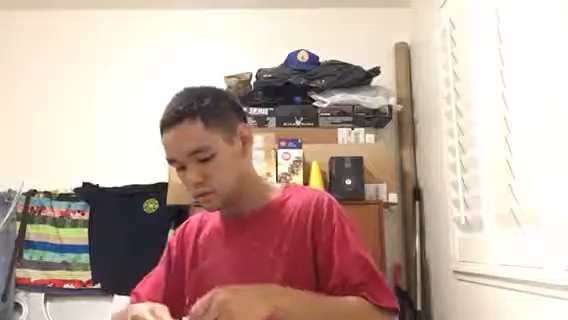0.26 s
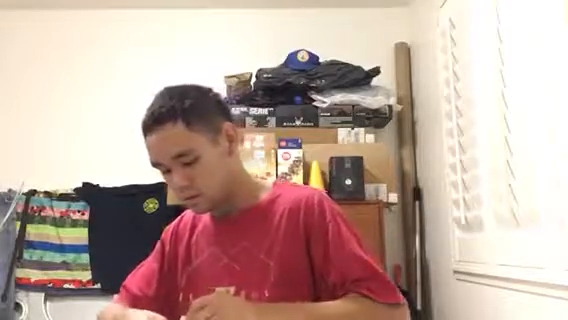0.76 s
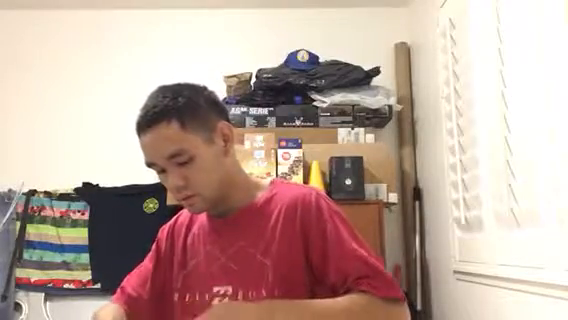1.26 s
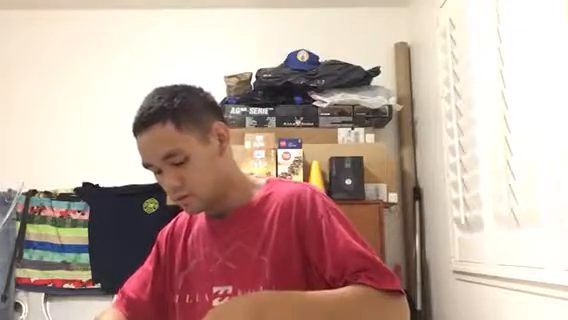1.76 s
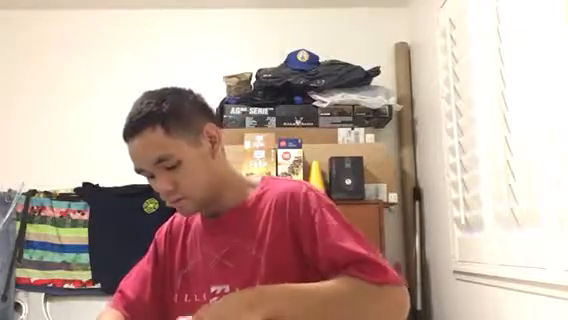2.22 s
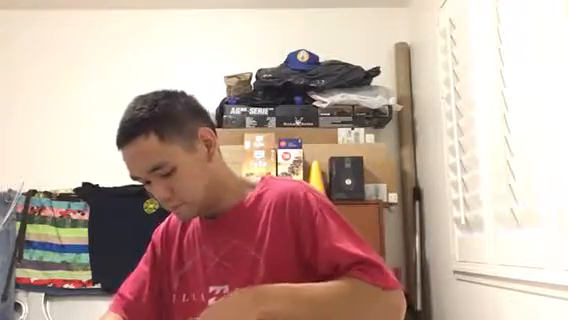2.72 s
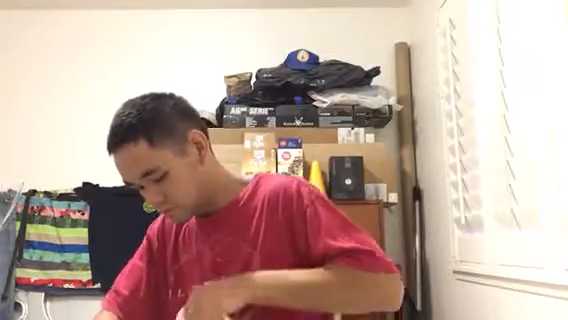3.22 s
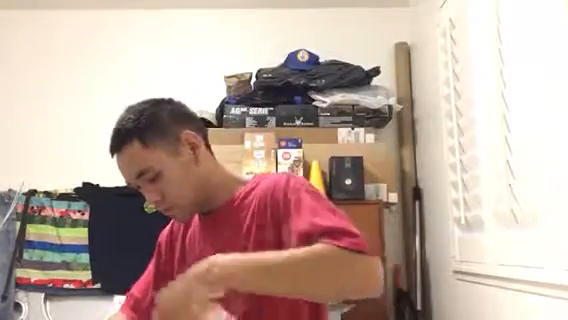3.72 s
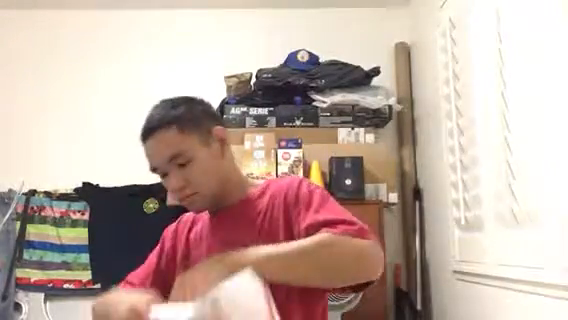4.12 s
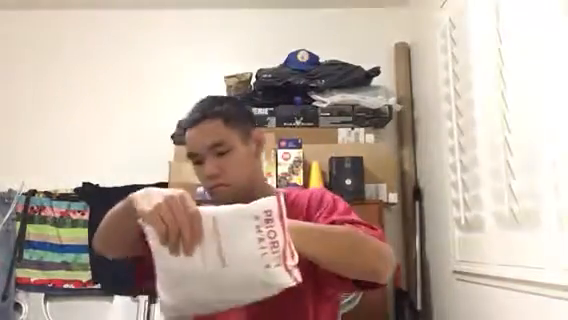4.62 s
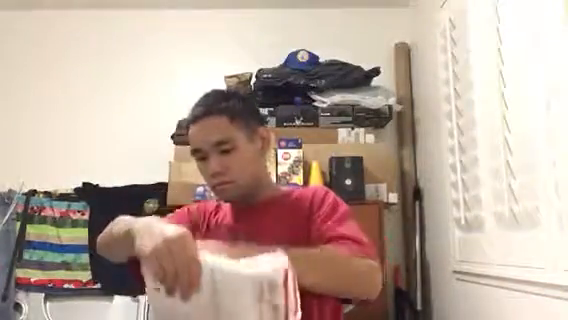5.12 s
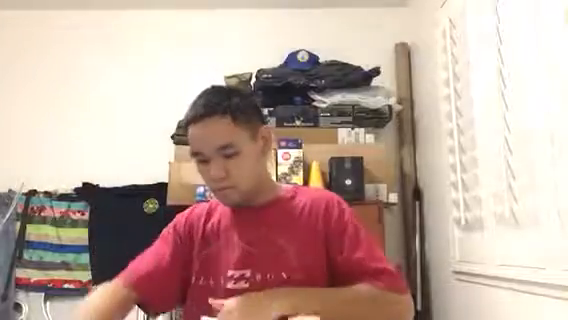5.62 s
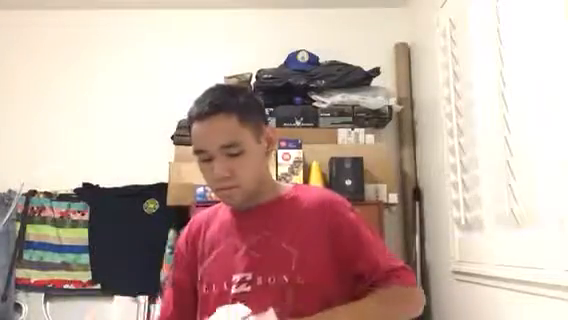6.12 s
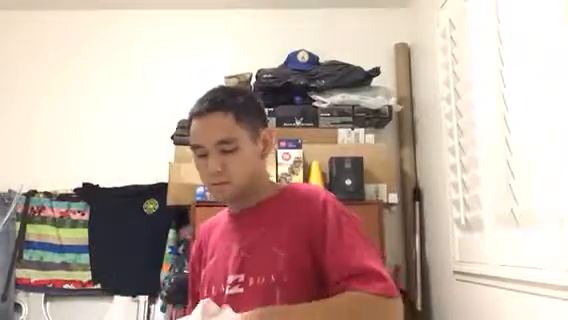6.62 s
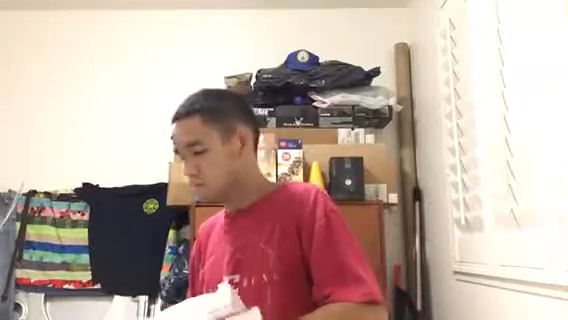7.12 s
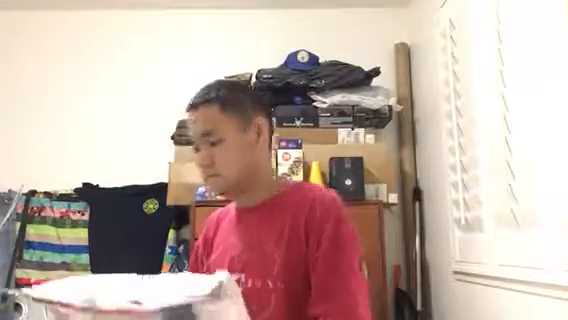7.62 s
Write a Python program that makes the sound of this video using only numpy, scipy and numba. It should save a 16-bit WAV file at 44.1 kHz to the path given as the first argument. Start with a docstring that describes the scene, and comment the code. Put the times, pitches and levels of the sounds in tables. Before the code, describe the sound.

Hands tug at a plastic padded envelope, crackling and snapping unevenly, loudest near three seconds, with small knocks on a desk and faint room hum.

```python
"""Padded envelope pulled open

Two hands pull open a padded plastic envelope in a small room, a metre from the microphone.
Buckling creases, sums of damped sines, give loud snaps over crackle that swells with each pull.
Air pockets pop as paired decaying tones; the parcel thuds on the desk as a decaying boom and knock.
Near surfaces return delayed copies, noise tails ring as the room, shaped noise hums and hisses."""
import sys
import numpy as np
from scipy import signal
from scipy.fft import rfft, irfft, next_fast_len
from scipy.io import wavfile
from scipy.ndimage import map_coordinates
from numba import njit

SR = 44100
rng = np.random.default_rng(int(sys.argv[2]) if len(sys.argv) > 2 else 0)


def wrap_up_sound(samples):
    """Save the sound to the file named by the first command line argument, as 16-bit audio."""
    columns = np.atleast_2d(samples).T
    # keep every value between -1 and 1, then stretch to whole-number steps
    tamed = np.clip(columns, -1, 1)
    steps = np.round(tamed * 32767).astype(np.int16)
    wavfile.write(sys.argv[1], SR, steps)


N = 346626

# Hum and hiss spectrum: freq_hz, relative_level_db
AIR_SPECTRUM = [(15, -22), (25, 8.5), (99, -0.5), (134, 1.5), (185, -10.5), (911, -11), (1790, -31),
                (2220, -20), (5730, -19), (16000, -36)]
# Room decay: freq_hz, t60_s
ROOM_DECAY = [(200, 0.15), (600, 0.22), (3500, 0.25), (12000, 0.24)]
# Echoes of near surfaces: delay_s, level_db
NEAR_ECHOES = [(.0025, -14), (.0045, -15), (.0086, -8), (.0125, -14)]
# Desk modes, boom then knock: freq_hz, t60_s
DESK_MODES = [(66, 0.2), (235, 0.063)]
# Parcel on the desk: start_s, boom_db, knock_over_boom_db
DESK_THUDS = [(1.012, -51, 13), (1.943, -54, -5), (2.317, -53, -7), (3.173, -39, 17.5), (3.682, -48.5, 8),
              (4.601, -56, -2), (5.171, -52.5, 24), (5.24, -43, -6), (5.993, -52, -6), (6.44, -61, 15),
              (7.139, -59, 4), (7.544, -53, 1), (7.831, -47, 1)]
# Pitch of big folds, wide, narrow and fine creases: pitch_hz
CREASE_PITCH_HZ = [450, 1350, 3800, 10500]
# Colour of the film: freq_hz, relative_level_db
FILM_COLOUR = [(120, -74.5), (250, -26.5), (500, -8.5), (920, 4.5), (1300, -1), (2100, 7), (2700, 0.5),
               (4200, 11.5), (6000, 9), (8500, 7), (10300, 1), (12500, 15), (16000, -13)]
# Fingers moving on the film: time_s, crackle_db
FINGER_HANDLING = [(0, -67.5), (1.3, -71), (1.6, -66.5), (1.78, -90), (1.9, -85), (2.03, -74), (2.2, -59.5),
                   (2.54, -70), (2.82, -70.5), (3.0, -62.5), (3.4, -60.5), (3.9, -78), (4.14, -84),
                   (4.29, -95.5), (4.45, -71.5), (5.01, -73.5), (5.3, -56.5), (5.47, -72), (6.24, -60),
                   (6.37, -84.5), (6.46, -69), (7.0, -68), (7.51, -64.5), (7.86, -48.5)]
# Hard pulls that crumple the film: full_s, rise_s, hold_s, crackle_db, body_db, treble_db
HARD_PULLS = [(0.845, 0.22, 0.027, -55, -2, 2), (0.986, 0.045, .03, -43, 0, -4.5),
              (1.022, 0.014, 0.006, -29, -1, 2), (1.47, 0.05, 0.054, -55, 3, -15.5),
              (1.942, 0.031, .005, -50.5, 9.5, 3), (2.337, 0.068, 0.013, -29.5, -4.5, -1),
              (3.119, 0.074, 0.087, -27.5, 0, -4), (3.699, 0.069, 0.0048, -47.5, 3.5, -10.5),
              (3.977, 0.11, 0.05, -62.5, 4, -9), (4.357, .04, 0.071, -64.5, 9.5, -7),
              (4.533, 0.039, 0.052, -33.5, -1.5, -10), (4.6, 0.097, 0.038, -37.5, 6, -1.5),
              (5.071, 0.05, .03, -51.5, 6, -12), (5.15, 0.049, 0.046, -36, 2.5, -7),
              (7.77, 0.19, 0.083, -45.5, 0.5, -8)]
# Hollow pops of air pockets: start_s, level_db, pitch_hz
AIR_POPS = [(0.208, -40, 676), (0.347, -44.5, 506), (0.763, -32.5, 1030), (0.839, -45, 479),
            (1.018, -17, 1458), (1.883, -49, 1046), (1.949, -34, 1317), (2.328, -24.5, 1840),
            (2.68, -43, 890), (2.727, -44.5, 840), (2.931, -42, 787), (3.025, -31.5, 890),
            (3.164, -14.5, 937), (3.188, -25, 331), (3.209, -21, 925), (3.693, -36, 475), (3.824, -50, 380),
            (4.571, -23, 1555), (4.608, -18, 750), (4.639, -37, 756), (5.053, -37, 635),
            (5.162, -20.5, 1620), (5.193, -29.5, 300), (5.342, -43.5, 400), (5.538, -39, 1530),
            (5.68, -45, 1240), (6.102, -47, 930), (6.401, -53, 342), (6.802, -51, 348), (7.537, -36.5, 997),
            (7.656, -42.5, 365)]
# Snaps of single creases: start_s, level_db, body_db (wide creases), treble_db (finest creases)
CREASE_SNAPS = [(0.0034, -39, 5, -36), (0.0985, -44.5, 2, -6), (0.2086, -38.5, 2, -3.5),
                (0.2906, -37.5, -20, -16), (0.345, -42.5, 3, -27), (0.396, -44.5, 2.5, -39),
                (0.455, -36.5, -7, -52), (0.5232, -27, -5, -20), (0.5692, -46.5, -26, -5),
                (0.637, -48, -35, -3), (0.681, -43.5, -10, -8), (0.7554, -40, 5, -16),
                (0.8078, -34, -8, -20), (0.8402, -42, 2, -16), (0.869, -34.5, -8, -18),
                (0.912, -44.5, -10, 4), (0.9534, -36.5, -15, -16), (0.9772, -25.5, -7, 0),
                (1.0179, -14.5, -14, -1), (1.0309, -11.5, -13, -1), (1.2083, -31.5, -2, -8),
                (1.3786, -45, 2, -14), (1.4085, -38.5, -11, -23), (1.4472, -30, -5, -37),
                (1.5147, -43, 2, -4), (1.5668, -34, -14, -23), (1.6277, -39, -9, -21),
                (1.8727, -63, 17.5, -17), (1.9278, -26.5, 4.5, -0.5), (2.0676, -41, -1, -20),
                (2.088, -25.5, -23, -15), (2.167, -54.5, 17, -10), (2.1931, -46, 5, -14),
                (2.208, -34.5, -6, -13), (2.2813, -18.5, -57, -2), (2.4591, -47, -16, -28),
                (2.6246, -42, -1.5, -34), (2.694, -48, 5, -2), (2.7422, -48.5, 8, -19),
                (2.8666, -49.5, 5.5, -15), (2.896, -48, -4, -4), (2.9286, -41.5, 3, -29),
                (2.9528, -43.5, 5, -34), (2.9809, -45, -4, -26), (3.02, -38.5, 7.5, -18),
                (3.0232, -30, -3, -35), (3.049, -31.5, -8, -10.5), (3.0772, -25.5, -13, -8),
                (3.1184, -25, -19, -20), (3.1652, -9.5, -10, -15), (3.1821, -6.5, -9, -14),
                (3.4086, -43, -22, -30), (3.4358, -43.5, -5, -18), (3.5171, -30.5, -4, -15),
                (3.5954, -43.5, 4.5, -39), (3.6246, -40, 1, -39), (3.6542, -32, -3.5, -12),
                (3.681, -31, 3, -32), (3.825, -46.5, 4, -40), (3.834, -41.5, -7, -47),
                (3.9282, -53, 7.5, -29), (4.1797, -43, 2.5, -31.5), (4.326, -51.5, 2, -21),
                (4.361, -47, 8.5, -16), (4.4782, -49, -6, 7), (4.5172, -22, -14, -13),
                (4.8895, -43.5, -10, -10), (4.9084, -35, -9.5, -27), (4.9986, -57, 7.5, -20),
                (5.055, -46, 9.5, -16), (5.0779, -39, -3, -20), (5.149, -24.5, -9, -10),
                (5.184, -24, 4, -13), (5.197, -22, -2, -10), (5.2772, -39, -21, -23),
                (5.3618, -36.5, -7.5, -17), (5.4714, -54, 10, -34), (5.5379, -45.5, 6, -40),
                (5.6027, -53, 6.5, -32), (5.6804, -35.5, -2.5, -32), (5.7155, -41, 1, -6),
                (6.003, -38.5, -0.5, -36), (6.102, -38.5, 1.5, -24), (6.1669, -51, 3, -27),
                (6.2493, -43.5, -9, -38), (6.4005, -48.5, 2, -40), (6.4485, -39, -4, -64),
                (6.539, -43.5, -1.5, -32), (6.589, -35.5, -0.5, -16), (6.6478, -46.5, 8.5, -27),
                (6.723, -53.5, 12, -23), (6.8004, -54, 9, -25), (6.9438, -46.5, -14, -19),
                (7.0386, -36, -6, -41), (7.1165, -37.5, 1.5, -23), (7.1263, -33, -5, -13),
                (7.2213, -37.5, 0, -35), (7.2645, -41, -7, -36), (7.3082, -43, 1, -26),
                (7.3318, -40, -3, -14), (7.375, -29.5, -11, -36), (7.3787, -23, -13, -47),
                (7.528, -44, -5, -25), (7.5366, -26, -4.5, -33), (7.6266, -56, 1, -18),
                (7.6596, -42, 3.5, -5), (7.76, -30.5, -3, -47)]

AIR_DB, ROOM_DB = -68.5, -5.0
POP_T60_S = 0.08
TOP_HZ, BASS_CUT_HZ, FILM_CUT_HZ = 15800, 44, 210
FOLDS_DB, FOLDS_GROW = -7.5, 1.65  # big folds follow the body, in wider swings
HANDLING_BODY_DB, HANDLING_TREBLE_DB = 7, -6.5
RISE_DB, FALL_DB_PER_S = 27, 244.5  # swell over the rise time; fade after the hold
# crackle left by a snap, relative to it; TRAIL_KEEPS is the share of its colour kept
TRAIL_DB, TRAIL_BODY_DB, TRAIL_TREBLE_DB, TRAIL_KEEPS = -21, 7, -3, .4
GRAIN_CAP_DB = 12  # cap on clump plus size, before the unevenness factor
# energy share of a -40 dB snap passed to its neighbours; louder snaps pass on less
AFTER_SHARE, CLEANER_PER_DB = 0.3, 0.02
OWN_DB = 3.5  # spread of the pitches each crease favours


def amp(db):
    """Decibels to gain."""
    return 10 ** (np.asarray(db) / 20)


def unit(x):
    """Scaled to rms 1."""
    return x / np.sqrt(np.mean(x ** 2) + 1e-20)


def along(points, hz):
    """(Hz, value) points interpolated on a log frequency axis."""
    point_hz, values = np.transpose(points)
    return np.interp(np.log(hz + 1), np.log(point_hz + 1), values)


def wobble(knots_per_s):
    """A smooth random curve through normally distributed knots."""
    knots = rng.standard_normal(int(N * knots_per_s / SR) + 4)
    return map_coordinates(knots, [np.arange(N) * knots_per_s / SR])


def filtered(x, response):
    """x times a response of frequency."""
    m = next_fast_len(N + SR // 2)
    return irfft(rfft(x, m) * response(np.fft.rfftfreq(m, 1 / SR)), m)[..., :N]


def air():
    """Hum of the house and microphone hiss: shaped noise, its level drifting slightly."""
    noise = rng.standard_normal(N)
    steady = unit(filtered(noise, lambda hz: amp(along(AIR_SPECTRUM, hz))))
    return amp(AIR_DB + 1.7 * wobble(7.8)) * steady


def room(x, size=4096):
    """Decaying noise tails; each stretch gets its own, since the hands move."""
    out = np.zeros(N + SR + 2 * size)
    fade = signal.windows.hann(2 * size, sym=False)
    x = np.pad(x, (size, 2 * size))
    for at in range(0, N + size, size):
        hz, t, bins = signal.stft(rng.standard_normal(SR // 3), SR, nperseg=256)
        decay = amp(-60 * t / along(ROOM_DECAY, hz)[:, None])
        tail = signal.istft(bins * decay, SR, nperseg=256)[1]
        tail_s = np.arange(len(tail)) / SR
        tail = tail * (1 - np.exp(-tail_s / 0.00043))  # echoes need time to thicken
        wet = signal.fftconvolve(x[at:at + 2 * size] * fade, tail / np.linalg.norm(tail))
        out[at:at + len(wet)] += wet
    return out[size:size + N]


def walls(x):
    """Desk, screen and shelf return weak delayed copies."""
    return sum(amp(db) * np.pad(x, (round(delay_s * SR), 0))[:N] for delay_s, db in NEAR_ECHOES)


def thuds():
    """Soft contact: two damped modes of the desk top, boom and knock, with a gradual onset."""
    out, t = np.zeros(N + SR), np.arange(SR // 4) / SR
    boom, knock = [amp(-60 * t / t60_s) * np.sin(2 * np.pi * hz * t) for hz, t60_s in DESK_MODES]
    onset = 1 - np.exp(-t / 0.0066)
    for start_s, boom_db, knock_db in DESK_THUDS:
        thud = amp(boom_db) * (boom + amp(knock_db) * knock) * onset
        out[round(start_s * SR):][:len(t)] += thud
    return out[:N]


def pops():
    """A dented air pocket rings as a decaying tone beating with a weaker, slightly higher twin."""
    out, t = np.zeros(N + SR), np.arange(SR // 8) / SR
    onset = 1 - np.exp(-t / .002)
    twins = rng.uniform(1.04, 1.1, len(AIR_POPS))  # pitch ratios
    for (start_s, db, hz), twin in zip(AIR_POPS, twins):
        ring = np.sin(2 * np.pi * hz * t) + 0.3 * np.sin(2 * np.pi * hz * twin * t)
        out[round(start_s * SR):][:len(t)] += amp(db - 60 * t / POP_T60_S) * ring * onset
    return out[:N]


@njit
def add(out, start, hz, gain, cycles, sr):
    """Adds damped sines, each falling 60 dB in its number of cycles."""
    for i in range(len(start)):
        life = int(cycles * sr / hz[i]) + 2
        for k in range(min(life, len(out) - start[i])):
            decay = np.exp(-np.log(1000) * k / life)
            out[start[i] + k] += gain[i] * np.sin(2 * np.pi * hz[i] * k / sr) * decay


def buckles(start_s, place, db, body_db, treble_db, cycles):
    """Creases flip over as damped sines; place 0-1 picks the pitch between 200 Hz and 15 kHz."""
    hz = 200 * 75 ** place
    kind = np.interp(np.log(hz), np.log(CREASE_PITCH_HZ), np.arange(len(CREASE_PITCH_HZ)))

    def near_to(order):
        return np.clip(1 - np.abs(kind - order), 0, 1)

    folds_db = FOLDS_DB + FOLDS_GROW * body_db
    # narrow creases, order 2, are the reference
    share_db = folds_db * near_to(0) + body_db * near_to(1) + treble_db * near_to(3)
    start = np.clip(start_s * SR, 0, N - 1).astype(np.int64).ravel()
    sign = np.sign(np.sin(1e4 * place))  # a crease flips in or out
    gain = sign * amp(db + share_db + along(FILM_COLOUR, hz))
    out = np.zeros(N)
    add(out, start, hz.ravel(), gain.ravel(), cycles, float(SR))
    return out


def strain():
    """Crackle level and colour each millisecond: powers of handling, pulls and snap trails add up."""
    t = np.arange(0, N / SR, .001)
    trails = [(start_s, .002, 0, db + TRAIL_DB, TRAIL_BODY_DB + TRAIL_KEEPS * body,
               TRAIL_TREBLE_DB + TRAIL_KEEPS * treble)
              for start_s, db, body, treble in CREASE_SNAPS]
    bursts = np.transpose(HARD_PULLS + trails)[:, :, None]
    full_s, rise_s, hold_s, db, body_db, treble_db = bursts
    swell_db = RISE_DB * np.maximum(full_s - t, 0) / rise_s
    fall_db = FALL_DB_PER_S * np.maximum(t - full_s - hold_s, 0)
    burst_power = amp(2 * (db - swell_db - fall_db))
    idle_power = amp(2 * np.interp(t, *np.transpose(FINGER_HANDLING)))
    power = burst_power.sum(axis=0) + idle_power

    def mixed(burst_db, idle_db):
        return ((burst_db * burst_power).sum(axis=0) + idle_db * idle_power) / power

    body_mix_db = mixed(body_db, HANDLING_BODY_DB)
    treble_mix_db = mixed(treble_db, HANDLING_TREBLE_DB)
    return t, 10 * np.log10(power), body_mix_db, treble_mix_db


def crackle(count=90000):
    """Thousands of creases a second: clumps and strays in a gentle pull, a more even roar in a hard one."""
    when, size, place = rng.random((count, 3)).T
    start_s = when * N / SR
    times, *curves = strain()
    db, body_db, treble_db = [np.interp(start_s, times, curve) for curve in curves]
    uneven = np.interp(db, [-64, -44], [1.15, .7])
    clumps_db = (1.77 * wobble(40) + 2.1 * wobble(150))[(start_s * SR).astype(int)]
    # patches of film favour their own pitches for a moment
    panels = rng.standard_normal((int(30 * N / SR) + 4, 20))
    clumps_db += 2.5 * map_coordinates(panels, [30 * start_s, 16 * place])
    size_db = -2.3 * (np.log(1 - size) + 1)
    grain_db = db + uneven * np.minimum(clumps_db + size_db, GRAIN_CAP_DB)
    return buckles(start_s, place, grain_db, body_db, treble_db, cycles=6.32)


def snaps(burst_parts=24, after_parts=60):
    """A crease lets go at all pitches, mostly within a millisecond, and sets off its neighbours."""
    start_s, db, body_db, treble_db = np.transpose(CREASE_SNAPS)[:, :, None]
    count = len(CREASE_SNAPS)
    after = np.clip(AFTER_SHARE - CLEANER_PER_DB * (db + 40), .01, .99)
    own = rng.standard_normal((count, 12))
    rows = np.arange(count)[:, None]
    out = np.zeros(N)
    # parts, mean delay_s, energy share, level_db
    stages = [(burst_parts, .0005, 1 - after, -4), (after_parts, .008, after, -6)]
    for parts, delay_s, share, level_db in stages:
        u = rng.random((count, 3, parts))
        place = (np.arange(parts) + u[:, 0]) / parts
        late_s = -delay_s * np.log(1 - u[:, 1])
        part_db = db + level_db + 10 * np.log10(share) + 5 * (u[:, 2] - .5)
        part_db += OWN_DB * map_coordinates(own, np.broadcast_arrays(rows, 11 * place), order=1)
        out += buckles(start_s + late_s, place, part_db, body_db, treble_db, cycles=6.35)
    return out


def scene():
    """Envelope and desk, their echoes, and the room tone."""
    # a small sheet radiates no bass
    thin = signal.butter(4, FILM_CUT_HZ, "highpass", fs=SR, output="sos")
    single, swarm = snaps(), crackle()
    # the swarm comes from all over the sheet, so its near echoes blur into the tail
    film, echoes = signal.sosfilt(thin, [single + swarm, walls(single)])
    near = film + pops() + thuds()
    return (near + echoes + amp(ROOM_DB) * room(near) + air())[None]


def record(dry):
    """A soft limiter rounds the highest peaks; the deep bass fades and nothing sounds above TOP_HZ."""
    rounded = dry / (1 + np.abs(dry / .75) ** 4) ** .25
    return filtered(rounded, lambda hz: (hz < TOP_HZ) / np.sqrt(1 + (BASS_CUT_HZ / (hz + 1)) ** 8))


dry = scene()
out = record(dry)
wrap_up_sound(out)
```